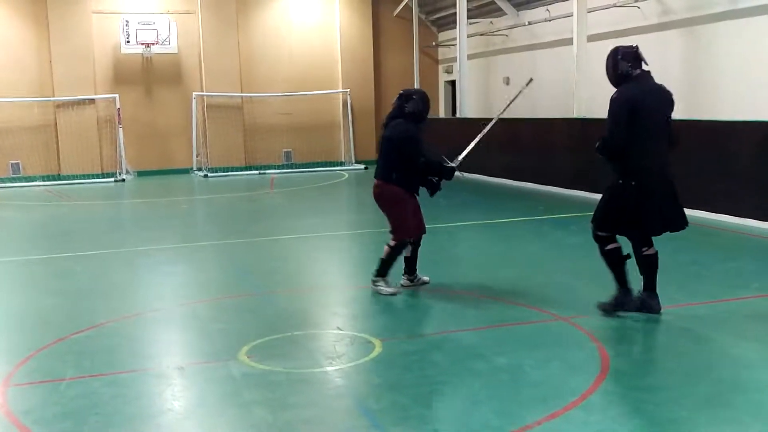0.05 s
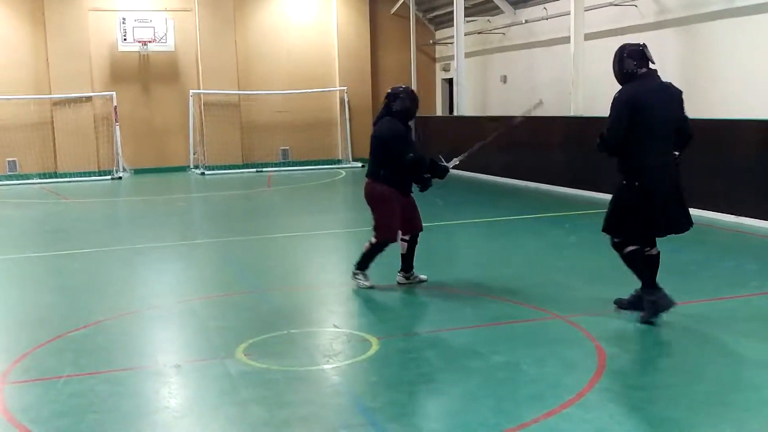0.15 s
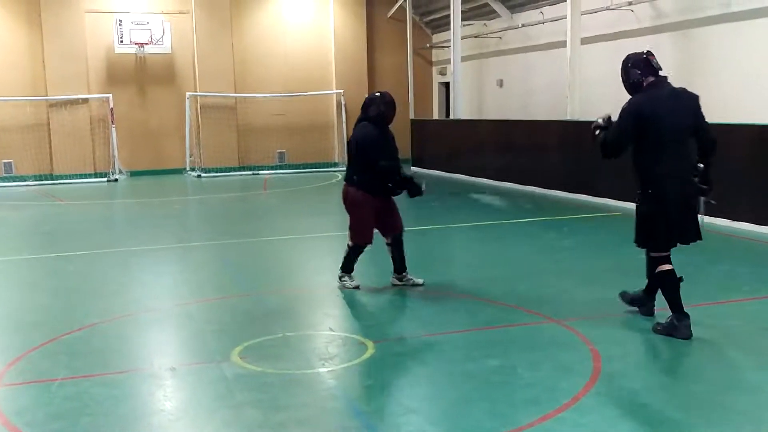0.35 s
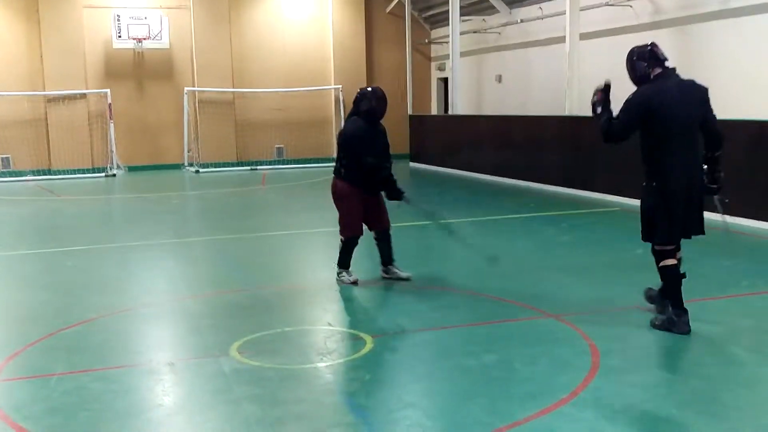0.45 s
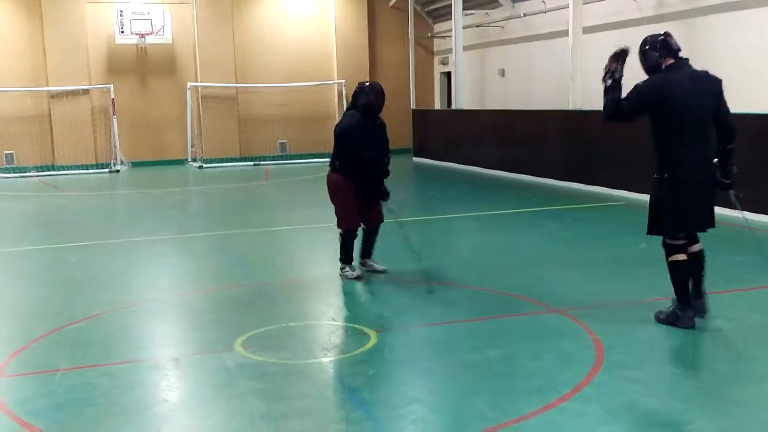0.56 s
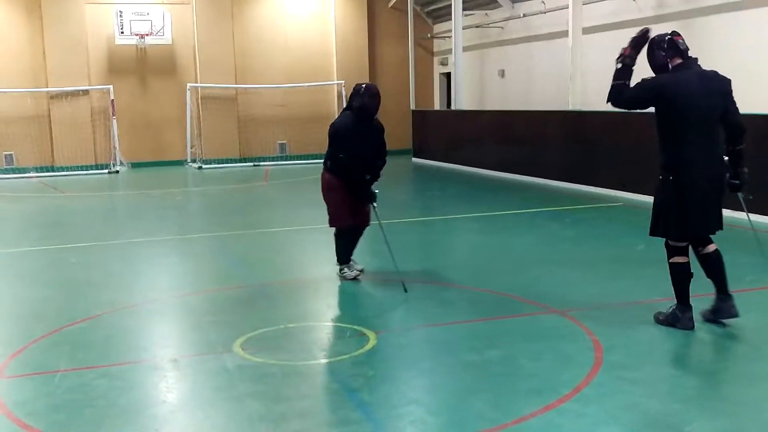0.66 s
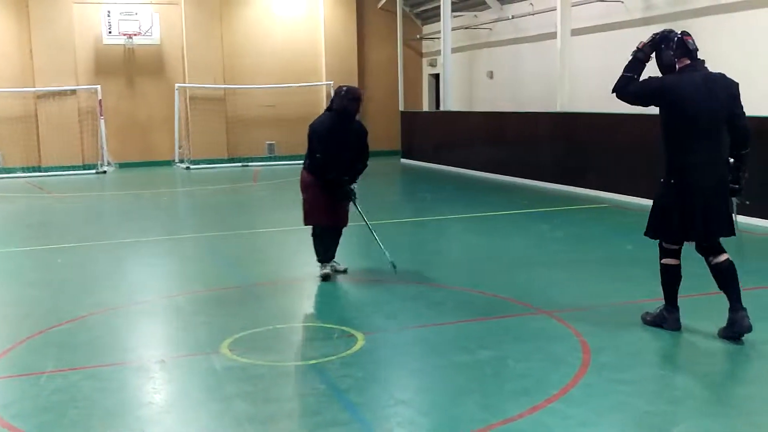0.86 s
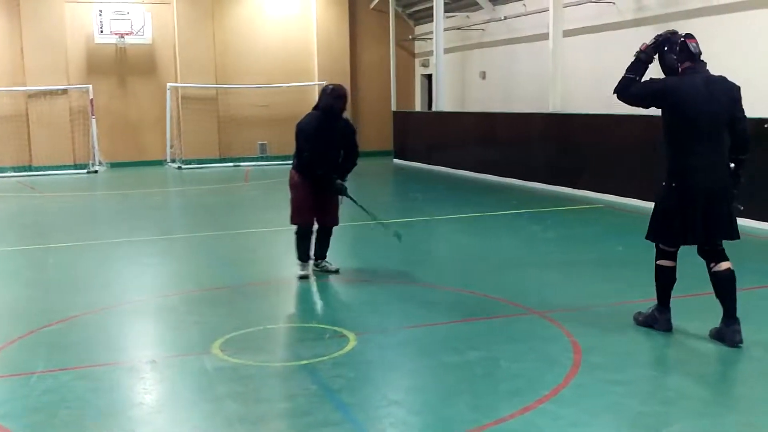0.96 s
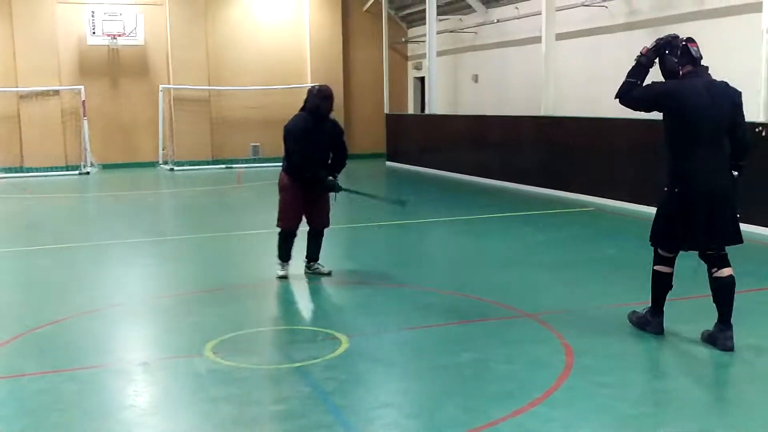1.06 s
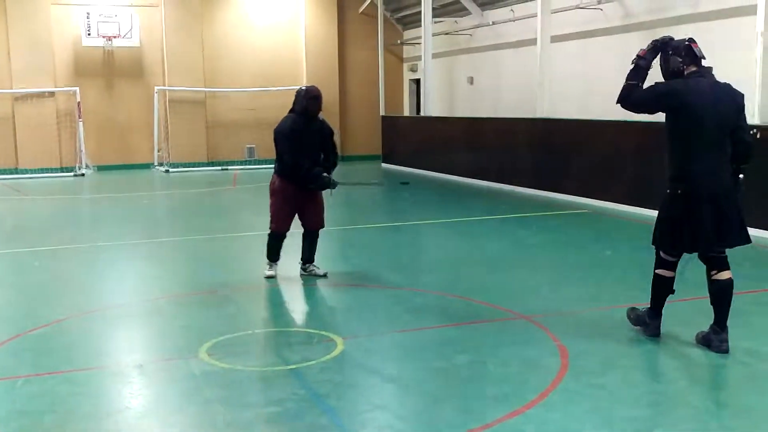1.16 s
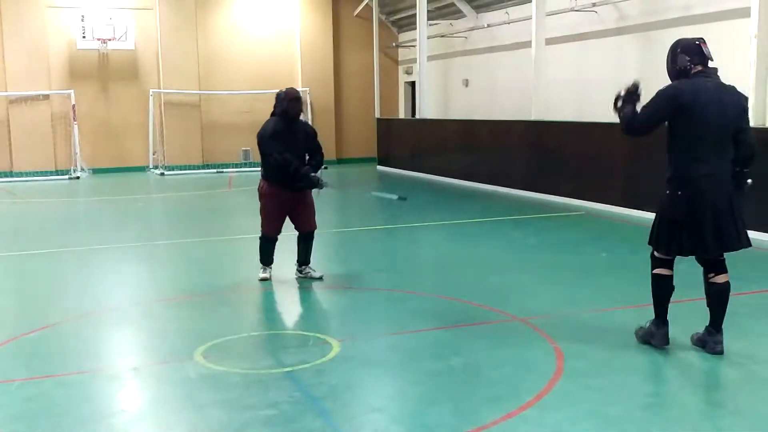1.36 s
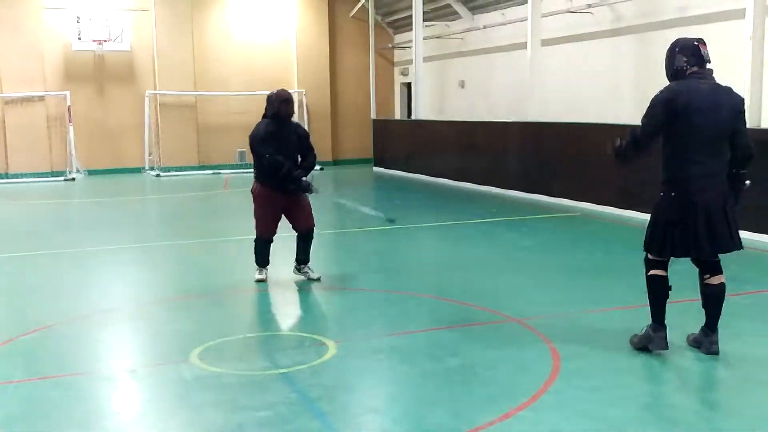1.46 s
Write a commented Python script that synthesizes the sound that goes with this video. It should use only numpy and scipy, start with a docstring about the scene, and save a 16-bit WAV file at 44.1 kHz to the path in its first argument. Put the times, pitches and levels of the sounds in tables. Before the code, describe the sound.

A single sharp clash of steel blades echoes through a gym over soft footsteps.

```python
"""Two steel practice swords meet once in a large sports hall. First come faint room noise, a thin hiss
that soon fades, and soft footfalls. At 0.2 s the blades hit with a hard crack and a short, bright chatter.
The walls and roof slap back, then the ringing of the steel spreads into a long wash that dies away,
treble first. Under it the fencers' feet go on thudding on the sprung floor."""
import sys
import numpy as np
from scipy import signal
from scipy.fft import rfft, irfft
from scipy.io import wavfile
from scipy.ndimage import uniform_filter1d

SR = 44100
rng = np.random.default_rng(int(sys.argv[2]) if len(sys.argv) > 2 else 0)


def transcribe(u):
    """Save the signal u as a 16-bit wav file named by the first command-line argument.

    u: samples, shape (n,) or (channels, n), limited to [-1, 1]; the rate is SR.
    q: integer samples, one column per channel.
    """
    v = np.clip(np.atleast_2d(u).T, -1, 1)
    q = np.round(v * 32767).astype(np.int16)
    wavfile.write(sys.argv[1], SR, q)


N = 66150
TIME = np.arange(N) / SR
FREQS = np.maximum(np.arange(N // 2 + 1) * SR / N, 1)
STRIKE_S, CONTACT_ATTACK_S, SLAP_ATTACK_S = 0.215, 0.00077, 0.0015
CUTOFF_HZ = 16000

# reverb time of the hall: (frequency [Hz], T60 [s])
HALL_DECAY = [(120, 1.36), (400, 2.3), (700, 2.92), (1000, 3), (2000, 2.54), (3500, 2.51), (5500, 1.82),
              (8000, 1.2), (11000, 0.82), (15000, 0.37)]
# stereo image of the hall, narrow lows and wide highs: (frequency [Hz], left-right correlation [-1..1])
HALL_CORRELATION = [(40, 0.5), (120, 0.74), (350, 0.86), (700, 0.67), (1400, -0.1), (3000, 0), (12000, 0)]
# lean of the stereo image: (frequency [Hz], left over right [dB])
STEREO_BALANCE = [(100, -1.7), (1500, -2), (3000, -2.6), (6000, -.5), (10000, 2)]


def from_db(db):
    """Decibels to gain."""
    return 10 ** (np.asarray(db) / 20)


def at_hz(points, hz):
    """Read a table on a log-frequency axis."""
    freqs, values = np.array(points).T
    return np.interp(np.log(hz), np.log(freqs), values)


def pan(db):
    """Left and right gains; positive dB leans left."""
    return from_db(np.array([[db], [-db]]) / 2)


def burst(start, attack, fall):
    """Percussive envelope; attack and fall are time constants in seconds."""
    age = np.maximum(TIME - start, 0)
    return (1 - np.exp(-age / attack)) * np.exp(-age / fall)


def noise(colour, eq_db=0, correlation=HALL_CORRELATION):
    """Coloured mid/side stereo noise at unit rms."""
    mid, side = rfft(rng.standard_normal((2, N)))
    alike = np.clip(at_hz(correlation, FREQS), -1, 1)
    signs = np.array([[1], [-1]])
    stereo = np.sqrt(1 + alike) * mid + np.sqrt(1 - alike) * side * signs
    db = at_hz(colour, FREQS) + eq_db + signs * at_hz(STEREO_BALANCE, FREQS) / 2
    x = irfft(from_db(db) * stereo, N)
    return x / x.std()


def blade_clash(steel_db):
    """Steel hits steel and chatters: six contacts within 40 ms."""
    # blade on blade: (time [s], level [dB], fall [s], left over right [dB], tilt [dB/octave])
    contacts = [(.2122, -16.5, 0.012, -4.5, -1), (.2146, -9.5, 0.0044, 11, -0.1),
                (.2200, -24.5, 0.069, 9, 2), (.2342, -19, .014, 0.5, 0.9), (.2418, -16, 0.023, -1, 2.5),
                (.2505, -19, 0.0068, 10.5, -1)]
    # narrower image of the direct sound: (frequency [Hz], left-right correlation [-1..1])
    direct_correlation = [(500, 0.97), (1500, .55), (3500, 0.22), (8000, .1)]
    return cracks(contacts, 0, CONTACT_ATTACK_S, steel_db, direct_correlation)


def blade_resonance():
    """The ring of the two blades as an EQ curve in dB, one bell per cluster of close modes."""
    # mode clusters: (frequency [Hz], gain [dB], width [Hz])
    blade_modes = [(462, 5.5, 33), (613, 8.5, 63), (692, 5.5, 69), (875, 5.5, 50), (999, 8, 88),
                   (1428, 5.5, 74), (1578, 6, 220), (1848, 5.5, 60), (2028, 5.5, 39), (2194, 3.5, 60),
                   (2984, 4, 84), (3480, 4.5, 210), (4230, 5, 55), (4480, 4, 160), (4710, 8, 39),
                   (4980, 4, 81), (5366, 7, 100), (5780, 3, 52), (6400, 4.5, 90), (6700, 3.5, 150),
                   (7270, 4, 84), (8380, 6.5, 98), (8775, 4.5, 150), (9320, 4.5, 240), (9770, 4.5, 110),
                   (10270, 9, 110), (11630, 3, 360), (12750, -3, 170)]
    return sum(db * np.exp(-np.log(16) * ((FREQS - hz) / width) ** 2) for hz, db, width in blade_modes)


def cracks(hits, start, attack, steel_db, correlation):
    """Each blow or slap is a dense, fast-dying burst of steel modes."""
    # tone of the crack: (frequency [Hz], level [dB])
    crack_colour = [(50, -50.5), (200, -15), (450, -12.5), (700, -6), (1500, -4), (3000, 1.5), (4800, -2.5),
                    (7200, 5), (9500, 0), (12500, -4.5), (16000, -15)]
    octaves = np.log2(np.maximum(FREQS / 500, 1))  # the tilt acts above 500 Hz
    out = 0
    for delay, db, fall, pan_db, tilt_db in hits:
        steel = noise(crack_colour, steel_db + tilt_db * octaves, correlation)
        out = out + from_db(db) * pan(pan_db) * burst(start + delay, attack, fall) * steel
    return out


def wall_slaps(steel_db):
    """The right-hand wall and the roof throw the crack back."""
    # early reflections: (delay [s], level [dB], fall [s], left over right [dB], tilt [dB/octave])
    slaps = [(.059, -23.5, 0.012, 0, -4.5), (.069, -20, .009, -7, 1.5), (.098, -24, 0.017, -6, -2.5)]
    return cracks(slaps, STRIKE_S, SLAP_ATTACK_S, steel_db, HALL_CORRELATION)


def ringing_wash(steel_db, level_db=-18, predelay_s=0.053, grain_db=0.5, grain_s=0.0054):
    """The blades' ringing fills the hall, its echoes arriving in uneven clumps."""
    # tone of the clash once it has spread: (frequency [Hz], level [dB])
    wash_colour = [(50, -39), (150, -18.5), (300, -13.5), (390, -2.5), (530, -11), (700, -6), (1000, -4),
                   (1250, -2.5), (1600, -4.5), (2400, -1.5), (3400, 0), (4400, -1.5), (5800, 1.5),
                   (7000, 7), (8000, 5), (9200, 3), (11000, -1), (13000, -0.5), (16000, -17)]
    swing = uniform_filter1d(rng.standard_normal(N), size=int(grain_s * SR))
    clumps = from_db(grain_db * swing / swing.std())
    return from_db(level_db) * clumps * hall_tail(noise(wash_colour, steel_db), STRIKE_S + predelay_s)


def hall_tail(sound, start, bands=28, build_s=0.02):
    """Diffuse reverb builds up, then dies band by band at the hall's rate."""
    spectrum = rfft(sound)
    age = np.maximum(TIME - start, 0)
    centres = np.linspace(np.sqrt(100), np.sqrt(CUTOFF_HZ), bands) ** 2
    out = 0
    for hz, share in zip(centres, np.eye(bands)):
        band = irfft(spectrum * np.interp(FREQS, centres, share), N)
        out = out + band * from_db(-60 * age / at_hz(HALL_DECAY, hz))
    return out * np.sqrt(1 - np.exp(-age / build_s))


def singing_steel(level_db=-40, waver_hz=2.4):
    """Narrow steel tones waver as their reflections mix, and die with the hall."""
    # single modes that stand out of the clusters: (frequency [Hz])
    singing_modes = [4748, 6465, 6776, 6821, 6880, 7282, 8427, 8663, 8777, 9301, 9510, 9770, 10180, 10220]
    out = 0
    for hz in singing_modes:
        waver = uniform_filter1d(rng.standard_normal((2, N)), size=1500)
        cycles = np.cumsum(hz + waver_hz * waver / waver.std(), axis=1) / SR + rng.random((2, 1))
        fall = at_hz(HALL_DECAY, hz) / np.log(1000)
        out = out + np.sin(2 * np.pi * cycles) * burst(STRIKE_S, SLAP_ATTACK_S, fall)
    return from_db(level_db) * out


def footsteps(hall_response, sag=0.9, sag_s=0.0016, reverb_db=-9):
    """Each sole taps and sets the sprung floor thudding for a few cycles, sagging in pitch."""
    # footfalls: (time [s], level [dB], settled pitch [Hz], T60 [s], tap offset [dB])
    steps = [(0.157, -43.5, 138, .06, -14), (.181, -43.5, 124, 0.028, -8), (0.2422, -43, 135, .04, 10.5),
             (0.2723, -28.5, 150, 0.035, -8), (.356, -29.5, 147, 0.037, -13),
             (.408, -36.5, 125, 0.064, -1.5), (.432, -43, 113, 0.12, -18), (0.444, -42.5, 113, 0.079, -11),
             (0.483, -34.5, 126, 0.037, -14), (0.497, -39, 129, 0.027, -20), (.700, -57, 140, 0.07, -19),
             (.818, -46, 138, .06, -9), (0.879, -48, 128, 0.068, -19), (1.099, -47.5, 182, .03, -18),
             (1.2865, -32, 149, 0.039, -15.5), (1.324, -43.5, 210, 0.029, -6),
             (1.401, -46.5, 110, 0.053, -9), (1.4772, -36.5, 128, 0.066, -10)]
    # tone of the sole's tap: (frequency [Hz], level [dB])
    sole_colour = [(40, -12), (150, -6.5), (350, 0.5), (900, -15.5), (3000, -17), (9000, -26.5),
                   (16000, -45)]
    thuds, taps = 0, 0
    for start, db, hz, t60, tap_db in steps:
        age = np.maximum(TIME - start, 0)
        cycles = hz * (age + sag * sag_s * (1 - np.exp(-age / sag_s)))
        envelope = burst(start, attack=0.0023, fall=t60 / np.log(1000))
        thuds = thuds + 2 * from_db(db) * np.sin(2 * np.pi * cycles) * envelope
        taps = taps + from_db(db + tap_db) * burst(start, CONTACT_ATTACK_S, fall=0.0086)
    reverb = signal.fftconvolve(thuds[None], hall_response, axes=1)[:, :N]
    reverb /= np.sqrt(np.sum(hall_response ** 2) / 2)
    bass_pan = pan(STEREO_BALANCE[0][1])
    return thuds * bass_pan + taps * noise(sole_colour) + from_db(reverb_db) * reverb


def room_tone(rumble_db=-54, hiss_db=-51, fade_start_s=0.13, fade_db_per_s=35):
    """A steady low rumble, and a faint bright hiss that hangs in the hall and then fades."""
    # tone of the rumble: (frequency [Hz], level [dB])
    rumble_colour = [(25, -19), (60, -9.5), (140, 0), (260, -12), (600, -14.5), (1500, -12.5),
                     (4000, -18.5), (9000, -34), (15000, -39.5)]
    # tone of the hiss: (frequency [Hz], level [dB])
    hiss_colour = [(500, -9), (1500, -11.5), (3000, -8.5), (5500, -3), (8500, -4.5), (11000, -12),
                   (15000, -24.5)]
    fade_db = fade_db_per_s * np.maximum(TIME - fade_start_s, 0)
    return from_db(rumble_db) * noise(rumble_colour) + from_db(hiss_db - fade_db) * noise(hiss_colour)


def scene():
    """The clash and the footwork share one hall."""
    hall_response = hall_tail(noise([(100, 0), (CUTOFF_HZ, 0)]), start=0)  # from white noise
    steel_db = blade_resonance()
    swords = blade_clash(steel_db) + wall_slaps(steel_db) + ringing_wash(steel_db) + singing_steel()
    return swords + footsteps(hall_response) + room_tone()


def record(dry):
    """A steep low-pass trims the very top."""
    return signal.sosfilt(signal.ellip(10, .1, 80, CUTOFF_HZ, fs=SR, output="sos"), dry)


dry = scene()
out = record(dry)
transcribe(out)
```